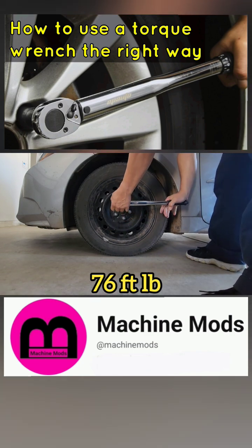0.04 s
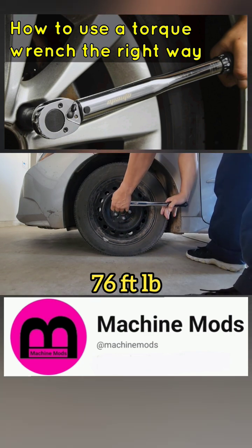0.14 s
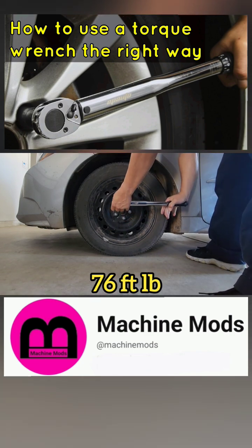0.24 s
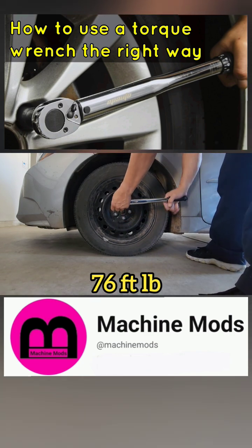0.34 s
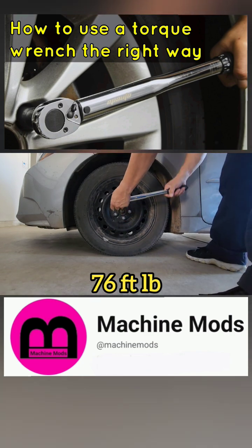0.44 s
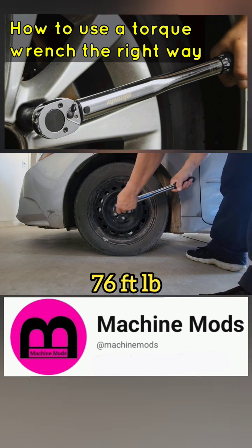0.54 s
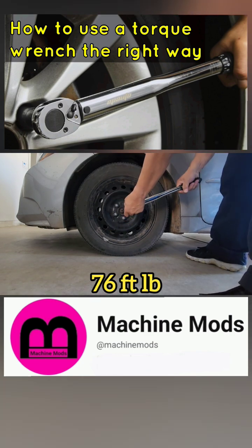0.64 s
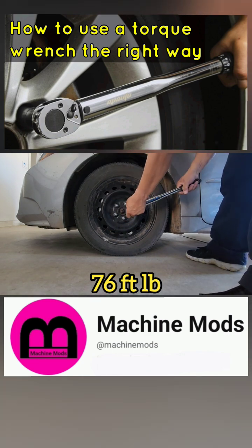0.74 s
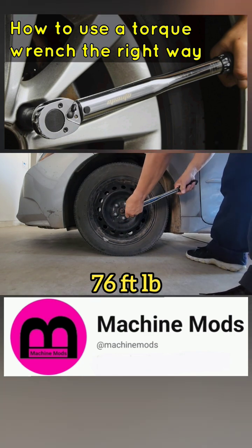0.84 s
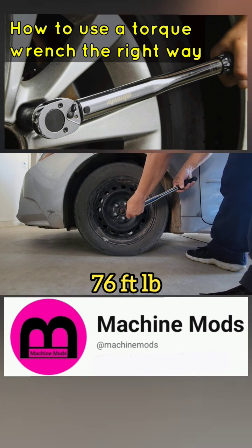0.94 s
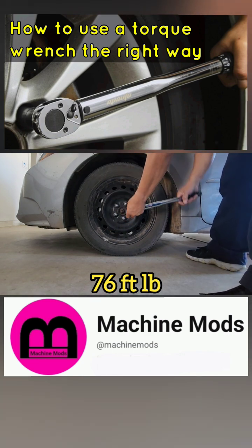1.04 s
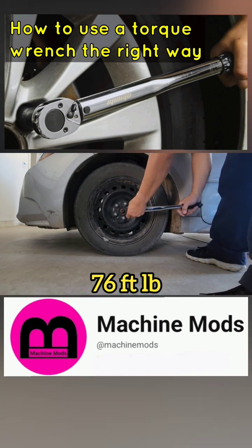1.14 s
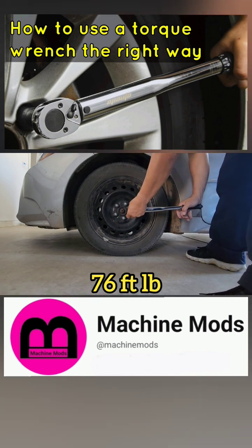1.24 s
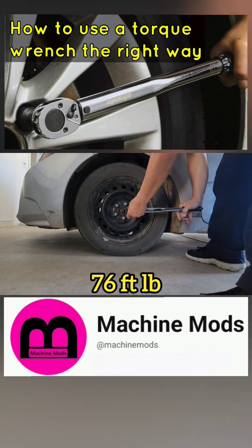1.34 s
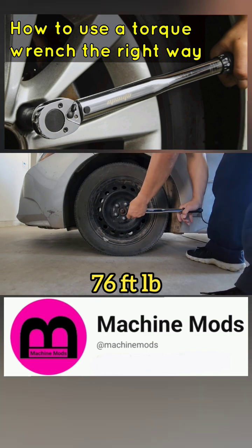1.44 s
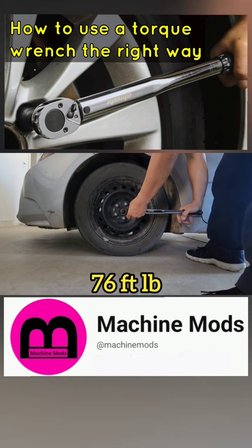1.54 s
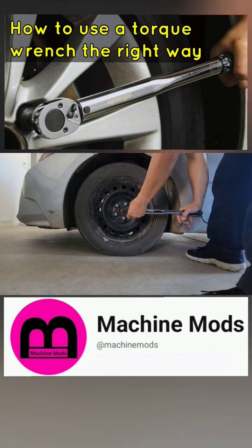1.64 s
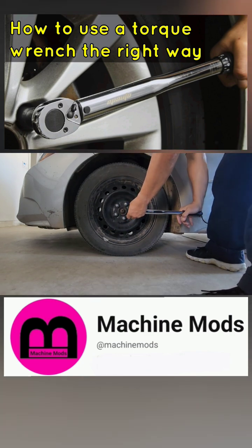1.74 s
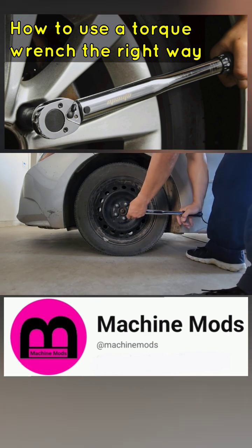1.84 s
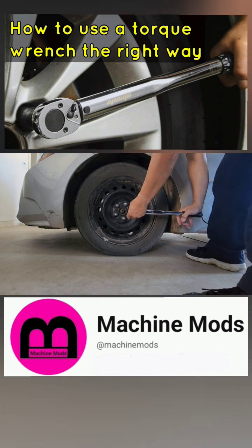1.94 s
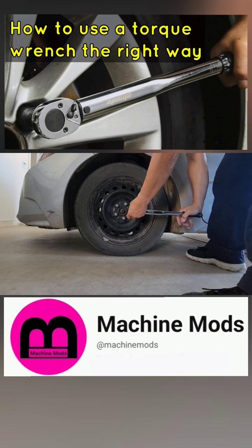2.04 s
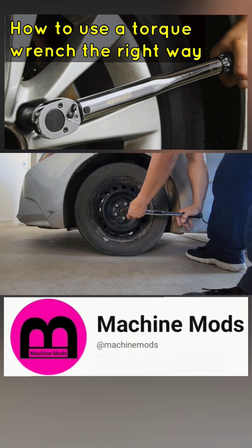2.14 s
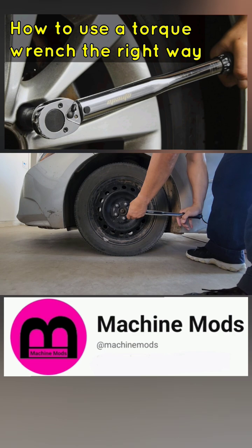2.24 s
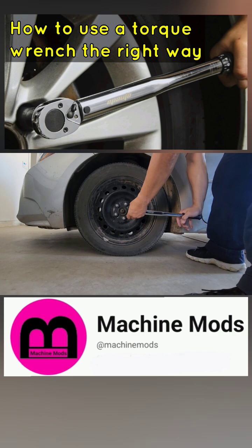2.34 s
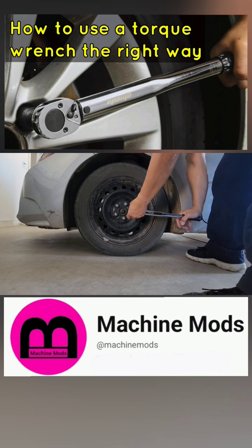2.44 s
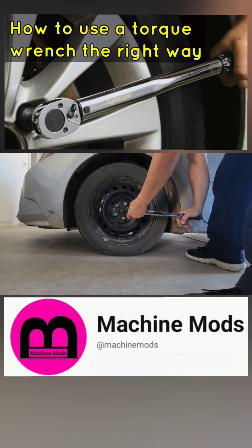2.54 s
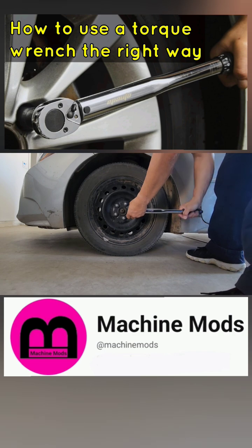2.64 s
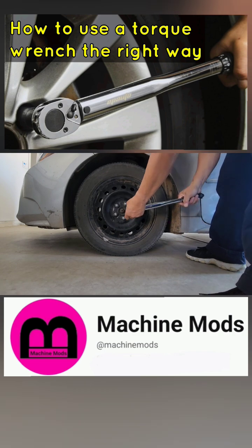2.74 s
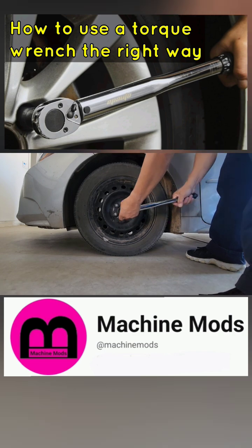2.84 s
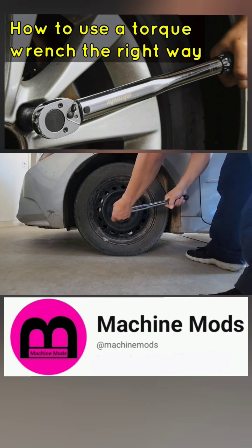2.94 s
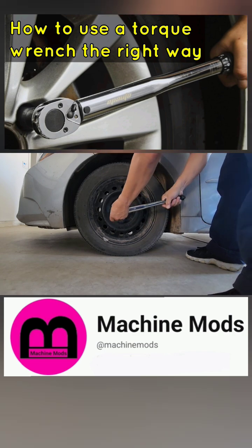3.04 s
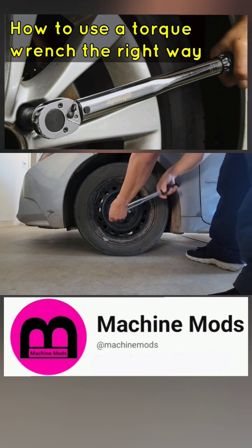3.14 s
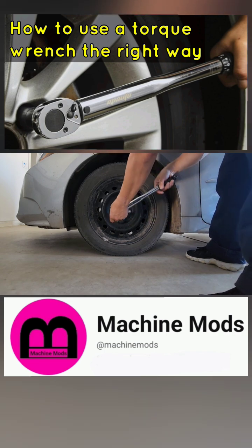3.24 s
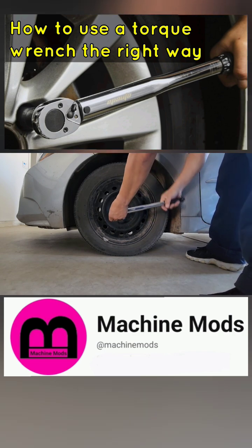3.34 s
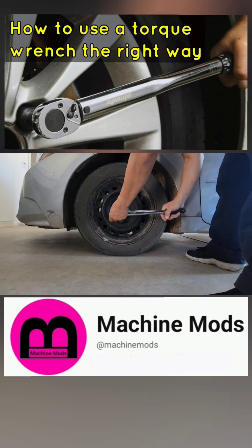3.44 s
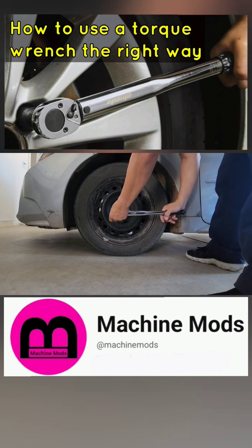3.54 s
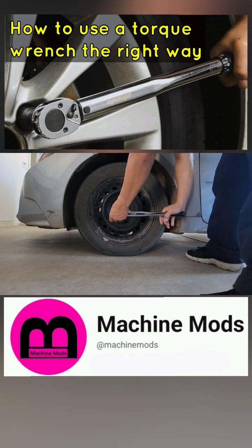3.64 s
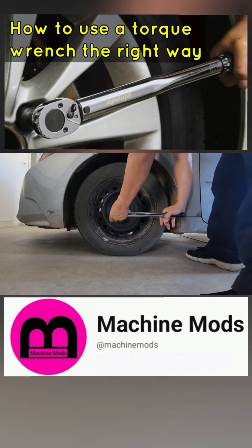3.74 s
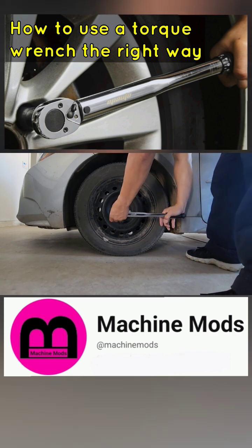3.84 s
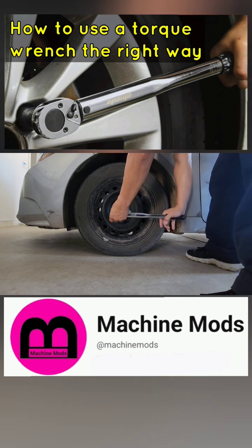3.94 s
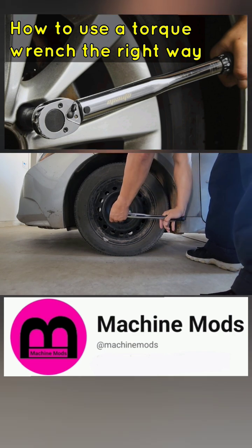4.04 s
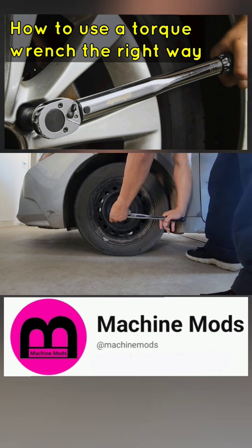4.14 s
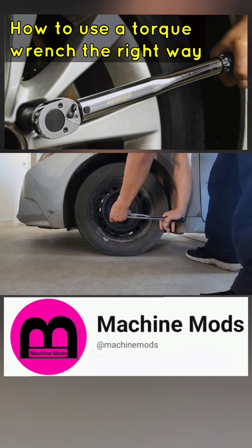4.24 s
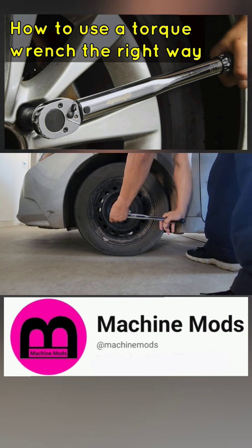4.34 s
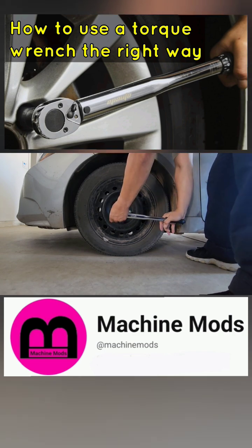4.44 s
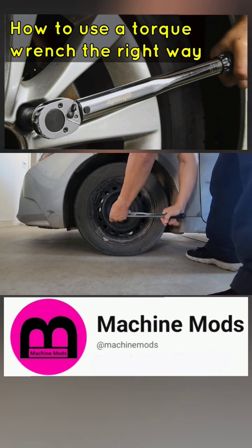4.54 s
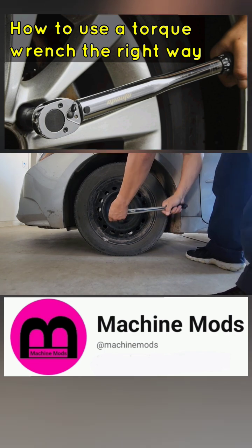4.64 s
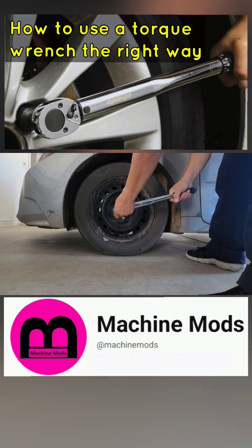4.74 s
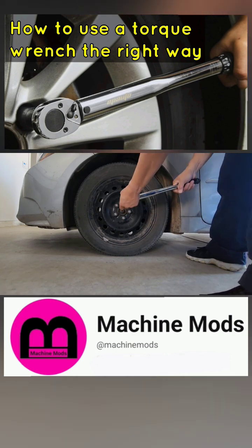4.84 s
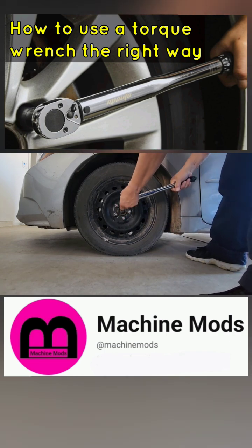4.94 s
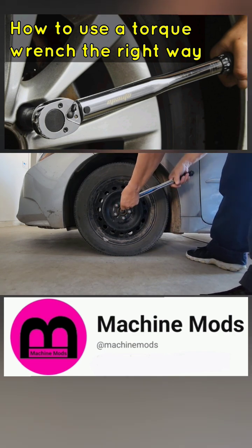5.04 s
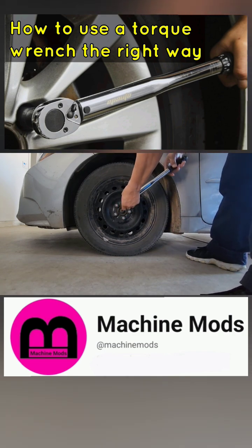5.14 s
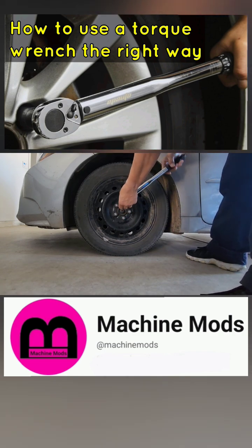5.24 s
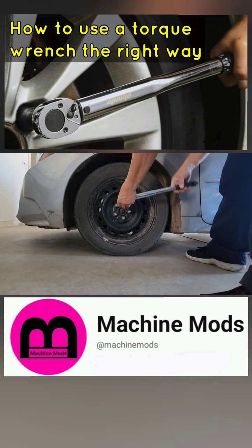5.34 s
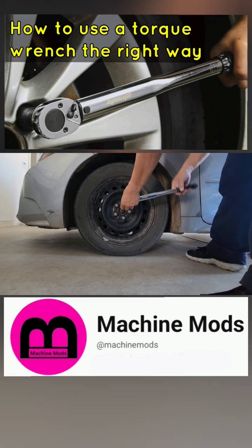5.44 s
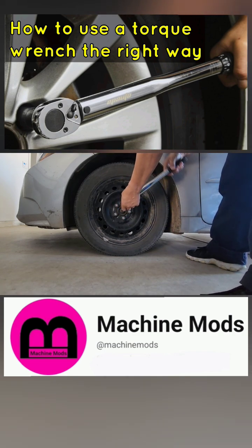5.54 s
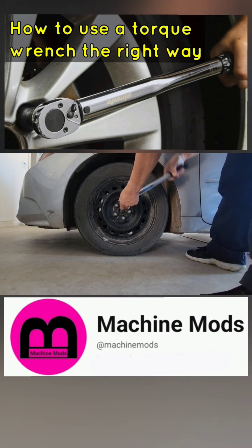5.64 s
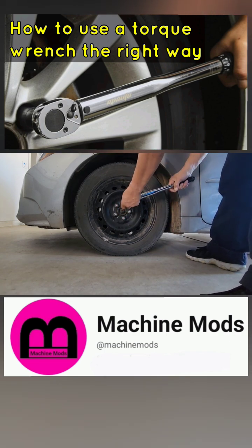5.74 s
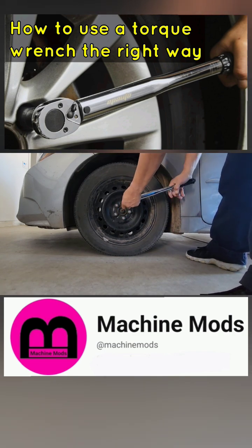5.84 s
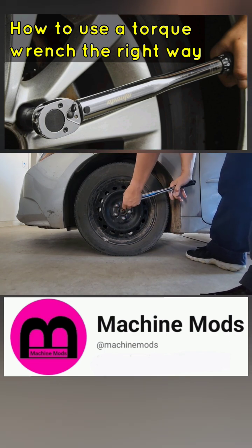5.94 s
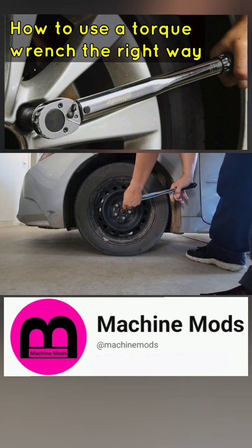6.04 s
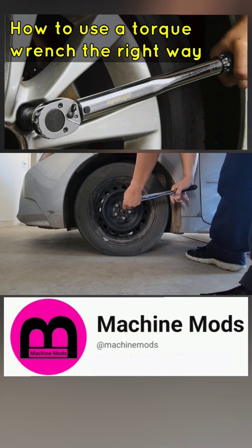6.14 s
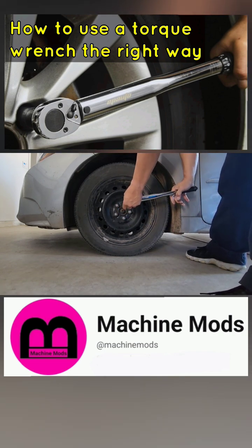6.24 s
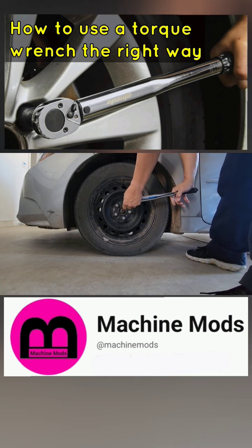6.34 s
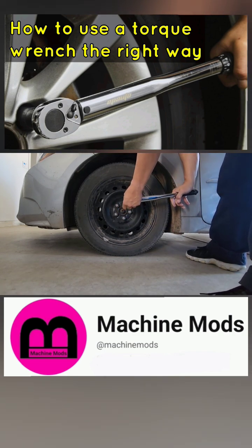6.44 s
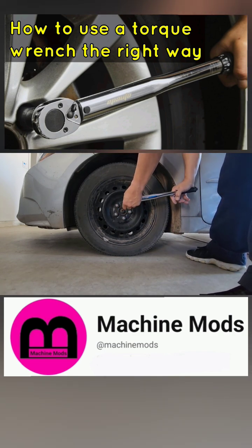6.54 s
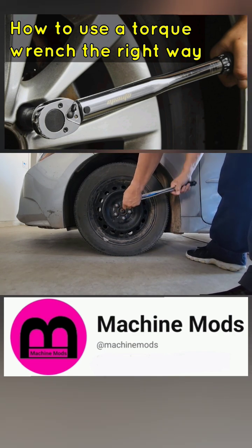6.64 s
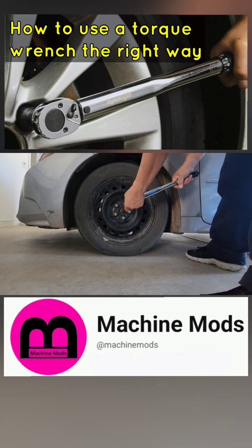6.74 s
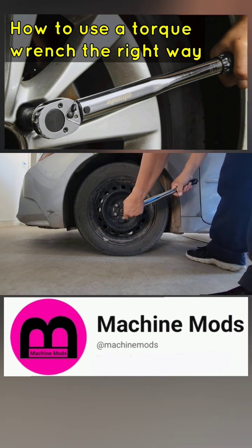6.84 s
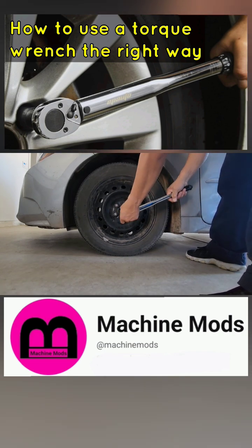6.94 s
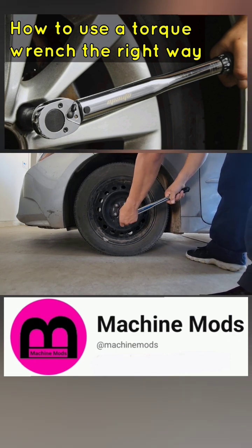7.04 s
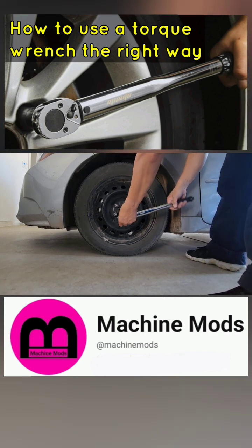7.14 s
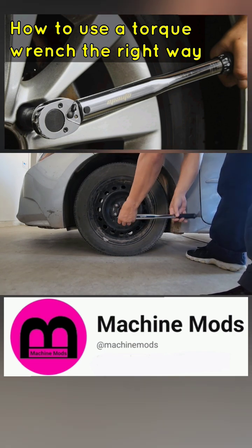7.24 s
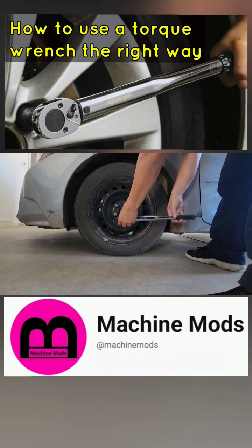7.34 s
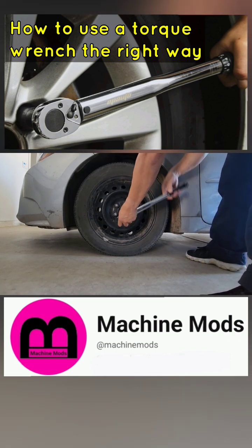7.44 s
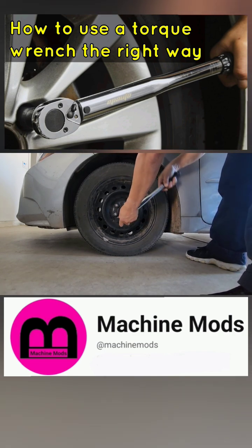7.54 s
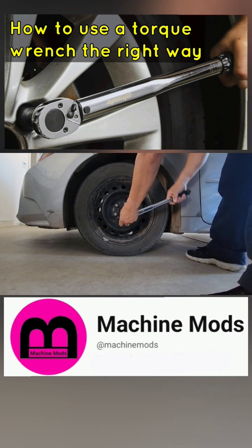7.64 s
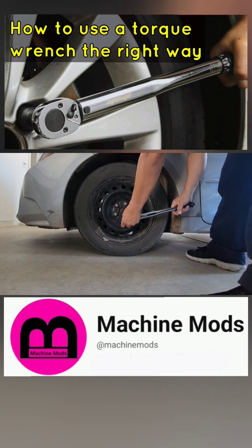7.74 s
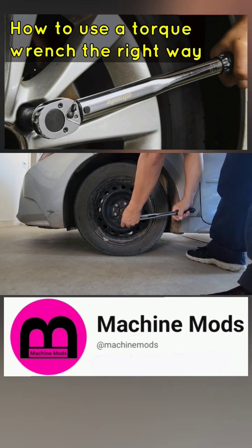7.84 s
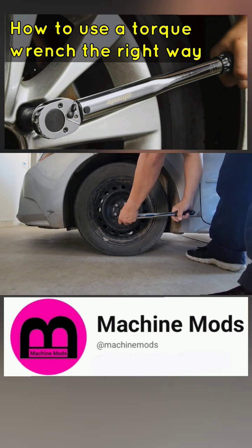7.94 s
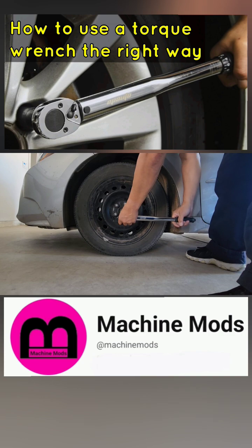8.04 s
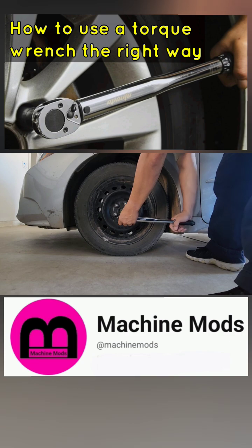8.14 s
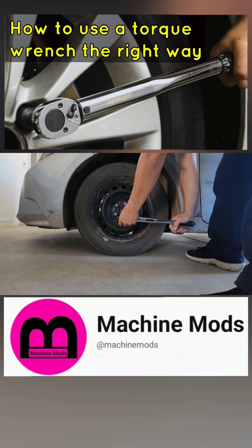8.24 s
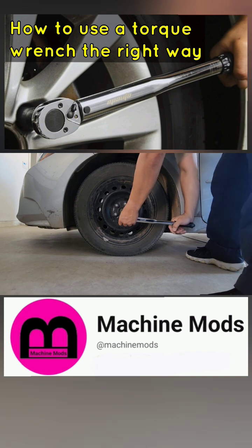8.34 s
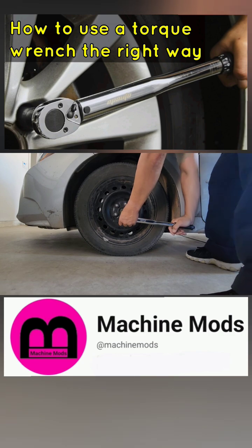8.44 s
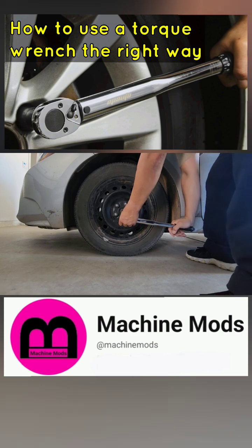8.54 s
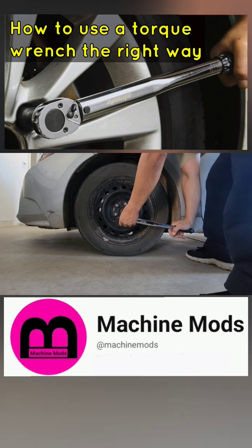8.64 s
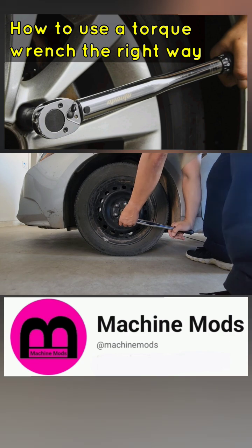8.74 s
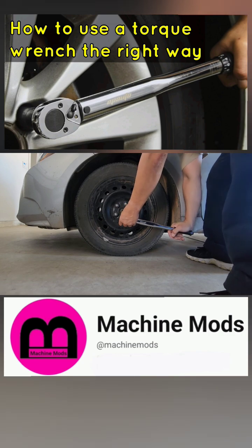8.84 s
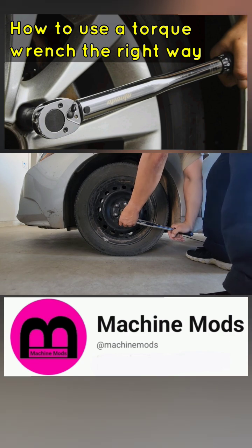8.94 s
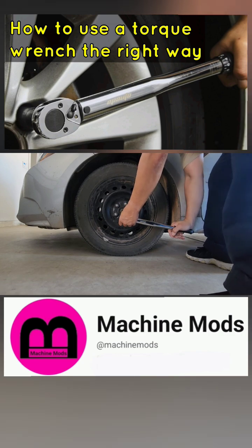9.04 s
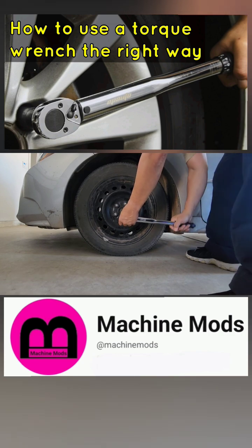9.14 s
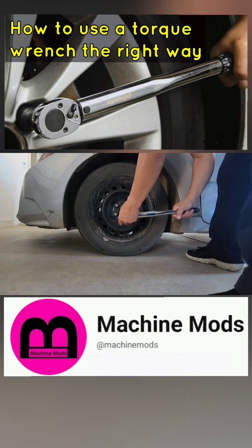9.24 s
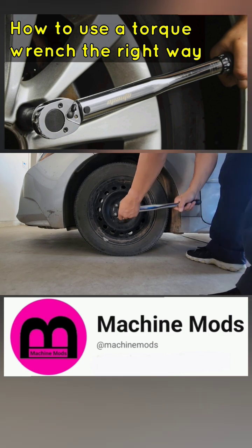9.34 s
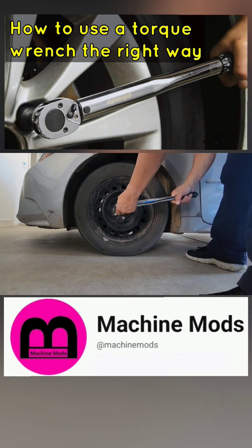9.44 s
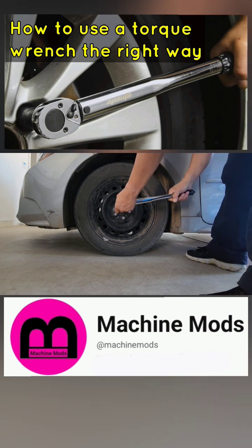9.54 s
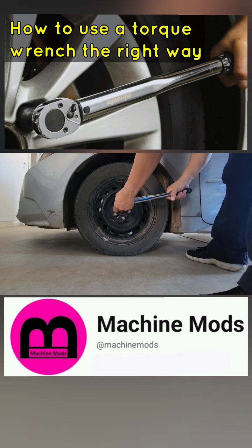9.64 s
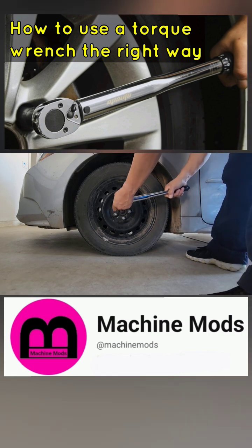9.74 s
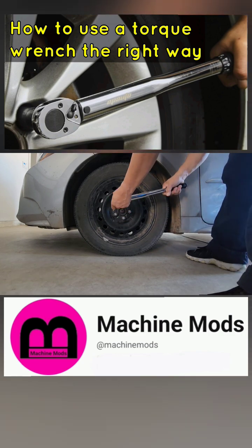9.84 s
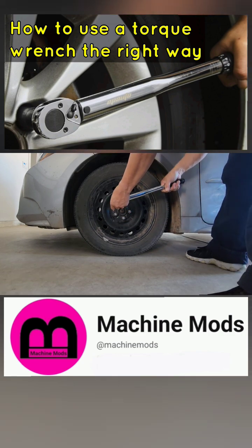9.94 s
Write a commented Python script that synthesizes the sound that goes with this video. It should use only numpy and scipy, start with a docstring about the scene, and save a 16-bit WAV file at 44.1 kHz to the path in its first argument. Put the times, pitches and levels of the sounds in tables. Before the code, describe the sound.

Close, sharp steel clicks come in five pairs as a torque wrench releases and snaps back on a car's wheel nuts. Between the pairs, the socket comes off, rattles lightly and drops onto the next nut with a short ring. A soft thud of shifting weight comes past the middle, then faint rubbing of sleeves and shoes. The socket clinks off once more at the end, against quiet garage air.

```python
"""A click-type torque wrench tightens five wheel nuts in a quiet garage, over faint hiss and rumble.
Each pull ends in a sharp release click; the hand eases off and a reset click follows, both ringing
through wrench and wheel. Then the socket tinks off the nut, clinks, scrapes and drops onto the next.
Near 6 s weight shifts on the floor, around 8 s sleeves and shoes rub, and after the fifth pair
of clicks, near 9 s, the socket comes off once more."""
import sys
import numpy as np
from scipy import signal
from scipy.fft import rfft, irfft
from scipy.io import wavfile
from scipy.ndimage import uniform_filter1d

SR = 44100
rng = np.random.default_rng(int(sys.argv[2]) if len(sys.argv) > 2 else 0)


def waveform_to_disk(signal):
    """Save audio, clipped to [-1, 1], as 16-bit WAV at the path in sys.argv[1]."""
    frames = np.transpose(np.atleast_2d(signal))
    scaled = np.clip(frames, -1, 1) * 32767
    samples = np.round(scaled).astype(np.int16)
    wavfile.write(sys.argv[1], SR, samples)


N = 440559


def torque_wrench():
    """The wrench lets go at the set torque, then snaps back. Gives timed blows and the tube's song."""
    # release clicks: t/s, level/dB, favoured pitch/Hz, its lift/dB, long ring/dB
    releases = [(0.202, -7.5, 2745, 7, -39), (2.5024, -8.5, 2426, 3.5, -46), (4.4551, -11.5, 2750, 12, -40),
                (6.4971, -10, 2740, 3, -42.5), (8.955, -10.5, 2590, 11, -38)]
    # reset clicks: the same columns, then tube song/dB
    resets = [(0.4296, -8, 7370, 0, -33, -56), (2.6873, -6, 2710, 2, -44, -55.5),
              (4.6127, -8.5, 2660, 5.5, -39, -42.5), (6.6758, -8.5, 7100, 5.5, -39.5, -68),
              (9.14, -7.5, 6870, 4, -38.5, -53.5)]
    # two close tube modes that beat slowly: f/Hz, level/dB, t60/s
    tube_modes = [(10870, 0, .8), (10877, -7, .8)]
    blows, song = [], np.zeros((2, N))
    for t, level_db, pitch_hz, lift_db, free_db in releases:
        click = blow(level_db, pitch_hz, lift_db, free_db, thump_db=-11.5, knock_db=-15.5, upper_db=2.5,
                     bright_db=-4, contact_ms=2, rise_ms=4, pan_db=-2, send_db=-2)
        blows.append((t, click))
    for t, level_db, pitch_hz, lift_db, free_db, tube_db in resets:
        click = blow(level_db, pitch_hz, lift_db, free_db, thump_db=-10, knock_db=-12.5, upper_db=2.5,
                     bright_db=-3.5, contact_ms=5, rise_ms=3.2, pan_db=-4.5, send_db=-8.5)
        blows.append((t, click))
        add(song, t, gain_of(tube_db) * ring(tube_modes, SR, scatter_db=0, detune=0))
    return blows, song


def loose_socket():
    """The socket knocks its way from nut to nut. Gives timed blows and the socket's own ring."""
    # pitched tinks off the nut: t/s, level/dB, knock/dB, brightness/dB, base contact/ms, pitch/Hz
    tinks = [(0.8213, -28, -10.5, -28, 1.2, 2030), (3.0685, -38.5, -3.5, -11, 7.3, 1910),
             (4.9825, -21, -14, -17, 5.6, 2090), (7.0431, -37, 0.5, -14, 4.7, 1960),
             (9.9077, -26, -5.5, -19, 4.2, 2407)]
    # it drops home on the next nut: same columns
    seatings = [(0.9227, -18.5, -7.5, -23, 7, 3060), (3.176, -17.5, -10.5, -17, 5.2, 5440),
                (5.4362, -16.5, -12.5, -14, 4.25, 5000), (7.4901, -15, -8, -11, 6, 7070)]
    # it drags over the nut: same columns
    scrapes = [(3.095, -20, -13, -12, 13, 7300), (3.146, -22.5, -17, -9.5, 15, 7600),
               (5.022, -17, -13, -12.5, 7.3, 2250), (7.087, -16.5, -13, -15.5, 13, 3000),
               (7.3243, -20, -16.5, -9, 4.9, 2760)]
    # it touches nut and wheel: same columns
    clinks = [(0.616, -40.5, -10, -12, 3.9, 1632), (0.8145, -49, 10, -58, 3, 1950),
              (0.848, -15, -16.5, -16.5, 15, 7550), (0.946, -28.5, -8.5, -17, 5.4, 3600),
              (1.1176, -53, 0, -27, 3.1, 2640), (1.1524, -32.5, -11.5, -20, 5.7, 4800),
              (1.3583, -58, -5, -29, 3.8, 2580), (1.5688, -59.5, -9, -23, 2.3, 5800),
              (2.784, -27.5, -23, -16, 2.7, 5600), (3.0829, -28, -18, -18, 5.7, 2080),
              (3.2784, -55, 5.5, -22, 4.4, 5560), (3.3176, -47.5, -19, -18, 3.9, 1920),
              (3.4441, -52, -6, -34, 6.4, 2570), (3.469, -43, -7, -26, 4.7, 4320),
              (3.6611, -61, -18, -21, 3.9, 2600), (3.7192, -66, -31, -39, 2.7, 2530),
              (4.7702, -40, -5.5, -2, 4.6, 2520), (5.2185, -47, -17, -11, 4.4, 3160),
              (5.261, -20, -23, -12, 7.2, 5150), (5.3919, -38, -4, -29, 4.9, 2600),
              (5.4041, -21.5, -12.5, -11.5, 2, 5810), (5.4277, -18, -18.5, -8.5, 8.5, 2760),
              (5.4544, -29, -8, -8, 2.6, 2140), (5.5897, -15.5, -20, -12.5, 9.7, 2820),
              (5.6527, -22, -19.5, -5, 4.7, 5220), (5.8014, -47, -3.5, -16, 5.3, 1640),
              (5.915, -54.5, -15, -29, 4.5, 2390), (7.081, -24.5, -7.5, -7, 2.6, 3174),
              (7.2587, -56, 10.5, -33, 3.9, 1600), (7.3387, -19, -14.5, -10.5, 11, 5200),
              (7.4831, -28.5, -18, -12, 6.7, 2680), (7.5552, -18, -20.5, -10.5, 12, 5570),
              (7.7669, -56, 8.5, -50, 4.2, 3400), (7.9663, -64.5, -7.5, -26, 3.9, 5200),
              (8.0537, -61, 10, -32, 1.36, 2130), (9.3222, -38, -12, -2.5, 4.5, 2500),
              (9.7513, -69, 0.5, -17, 3.9, 1425), (9.7744, -73, -4, -12.5, 5.6, 1782),
              (0.889, -33, -13, -32, 5.3, 2260), (9.9218, -19, -30, -15.5, 11, 2460)]
    # socket modes: f/Hz, level/dB, t60/s
    socket_modes = [(3110, -8.5, 0.39), (4170, -4.5, 0.23), (5645, -9, 0.19)]
    blows, ringing = [], np.zeros((2, N))
    for contacts, lift_db, rise_ms, garage_db in [(tinks, 19.7, 0.6, -3), (seatings, 9.5, 0.26, -8.5),
                                                  (scrapes, 3, 1.6, -3.24), (clinks, 7.8, 0.54, -7)]:
        for t, level_db, knock_db, bright_db, contact_ms, pitch_hz in contacts:
            thump_db = -20.5 - 0.48 * level_db + 0.5 * knock_db  # the tyre favours a soft push
            send_db = garage_db - 0.6964 * contact_ms  # a long chatter reaches the garage less
            touch = blow(level_db, pitch_hz, lift_db, free_db=-43, thump_db=thump_db, knock_db=knock_db,
                         upper_db=-4, bright_db=bright_db, contact_ms=contact_ms, rise_ms=rise_ms,
                         pan_db=-0.5, send_db=send_db)
            blows.append((t, touch))
    for t, level_db, *_ in seatings + scrapes + clinks:
        add(ringing, t, gain_of(level_db - 26.5) * ring(socket_modes, SR // 2, scatter_db=4, detune=.001))
    return blows, ringing


def blow(level_db, pitch_hz, lift_db, free_db, *, thump_db, knock_db, upper_db, bright_db,
         contact_ms, rise_ms, pan_db, send_db):
    """Steel strikes steel: a crack, then wrench, wheel and hub answer. Gives left, right, reverb send."""
    # wrench head and tube: f/Hz, level/dB, t60/s
    wrench_modes = [(2290, -8, 0.12), (2687, 1.5, 0.12), (3200, -6.5, 0.2), (4370, -13, 0.14),
                    (5280, -19.5, .05), (5350, -1.5, 0.19), (6700, -12, .04), (6320, 2.5, 0.15),
                    (6880, 1.5, 0.28), (7380, 15, 0.064), (8600, 0.5, 0.082), (10400, 4.5, 0.03),
                    (11200, 8, 0.035), (13125, 19.5, 0.043), (13000, 8.5, 0.054)]
    # brake, hub and socket, free to ring on: f/Hz, level/dB, t60/s
    free_modes = [(416, -5, 2.3), (465.3, -1, 2.4), (607, 4.5, 0.31), (888, -15, 1.6), (1375, -8.5, 2.1),
                  (5700, 5, .3)]
    length, routing = 2 ** 15, [0, 1, 0]  # the send is fed from the left
    t, hz = np.arange(length) / SR, np.fft.rfftfreq(length, 1 / SR)
    softness = 1.5 + 0.079 * max(-level_db - 28.5, 0)  # light touches are slow and rounded
    attack = 1 - np.exp(-t * 1000 / np.clip(rise_ms * softness, .1, 15))
    decay = np.exp(-t * 1000 / np.clip(contact_ms * np.sqrt(softness), .3, 25))
    wrench = gain_of(-1.5) * attack[:length // 4] * ring(wrench_modes, length // 4, scatter_db=2)
    spectrum = crack(attack * decay, hz) + rfft(wrench, length)
    tilt_db = curve([(760, knock_db), (900, knock_db + upper_db), (1450, knock_db + upper_db),
                     (2000, 0.021), (6000, 0.0036), (9500, bright_db)], hz)
    peak_db = lift_db * np.exp(-(np.log2((hz + 1) / pitch_hz) / 0.22) ** 2)
    peak_share = np.array([[1], [1], [0.25]])  # echoes mix all faces of the steel, blunting the pitch
    steel = irfft(spectrum[routing] * gain_of(tilt_db + peak_db * peak_share), length)
    steel *= gain_of([[pan_db / 2], [-pan_db / 2], [0]]) * np.hanning(2 * length)[length:]
    sound = gain_of(free_db) * ring(free_modes, 2 * length, scatter_db=1)[routing]
    sound[:, :length] += steel + wheel(t, attack, knock_db, upper_db, thump_db)[routing]
    sound[2] *= gain_of(send_db)
    return gain_of(level_db - 0.5) * sound


def crack(envelope, hz):
    """Steel chatters on steel for a few milliseconds: the stereo spectrum of a broad noise burst."""
    # colour of the crack: f/Hz, density/dB
    crack_spectrum = [(180, -26), (300, -3.5), (660, -6.5), (807, -12), (1170, -1), (1870, -12),
                      (2610, -12.5), (3840, -11.5), (6670, -11.5), (10100, -6.5), (14700, -9),
                      (15700, -9.5), (16500, -59.5)]
    left, other = rng.standard_normal((len(envelope), 2)).T
    chatter = envelope * np.array([left, 0.6 * left + 0.8 * other])  # each side hears another face
    chatter /= np.linalg.norm(chatter[0])
    return rfft(chatter) * unit_rms(gain_of(curve(crack_spectrum, hz))) * np.sqrt(SR / 200)


def wheel(t, attack, knock_db, upper_db, thump_db):
    """The rim knocks and the tyre thumps; the heavier the part, the later it gets moving."""
    # steel rim, damped by tyre and hand: f/Hz, level/dB, t60/s
    rim_modes = [(292, 0.5, 0.063), (347, -3.5, 0.028), (395, 4, 0.058), (584, 3.5, 0.054), (652, -8, 0.11),
                 (1000, -8, 0.082), (1175.6, -6, 0.024), (1242, 1, 0.016), (1497, -2, 0.11),
                 (1717, -5, 0.16)]
    # low modes of tyre and wheel: f/Hz, level/dB, t60/s
    tyre_modes = [(66.5, -12, 0.31), (80, -7, 0.31), (107.4, -8.5, 0.42), (146, 5, 0.13), (170, -1, 0.085)]
    # a hard click stirs the rim's upper modes, the socket mainly its lower ones
    stirred = [(f, db + upper_db * (f > 850), t60) for f, db, t60 in rim_modes]
    rim = ring(stirred, len(t), scatter_db=2, detune=0.005) * attack * (1 - np.exp(-t / 0.00089))
    tyre = ring(tyre_modes, len(t), scatter_db=1, detune=0.005) * (1 - np.exp(-t / 0.0082))
    return gain_of(knock_db) * rim + gain_of(thump_db) * tyre


def ring(modes, length, scatter_db, detune=0.0025):
    """Dying sines in stereo; strike point and grip vary, scattering the levels and pitches a little."""
    hz, db, t60 = np.transpose(modes)[:, :, None]
    t = np.arange(length) / SR
    level_draw, pitch_draw, start_phase, side_draw = rng.standard_normal((len(hz), 4)).T[:, :, None]
    phase = 2 * np.pi * hz * (1 + detune * pitch_draw) * t + start_phase
    right_shift = side_draw * np.minimum(hz / 900, 1.5)  # above the bass each side has its own phase
    envelope = gain_of(db + scatter_db * level_draw - 60 * t / t60) / np.linalg.norm(gain_of(db))
    envelope *= signal.windows.tukey(2 * length)[length:]
    return np.array([(envelope * np.sin(phase + shift)).sum(0) for shift in (0, right_shift)])


def in_garage(blows):
    """Each blow arrives direct, left side first, then through one of three alternating reverb tails."""
    direct, sends = np.zeros((2, N)), np.zeros((3, N))
    for k, (t, (left, right, send)) in enumerate(blows):
        onset = t - 0.0006
        add(direct[0], onset, left)
        add(direct[1], onset + rng.uniform(40e-6, 130e-6), right)
        add(sends[k % 3], onset, send)  # so like hits ring slightly differently
    return direct + sum(garage_reverb(send) for send in sends)


def garage_reverb(send):
    """A dense tail starts after the first wall, its top cut off sharply above 15 kHz."""
    # decay of the reverb tail: f/Hz, t60/s
    decay_times = [(100, 0.57), (400, 0.36), (1100, 0.49), (2900, 0.41), (7700, 0.25), (15000, 0.15),
                   (16000, 0.017)]
    frame_t = np.arange(SR // 64) * 64 / SR
    tail = diffuse(lambda hz: -60 * frame_t / curve(decay_times, hz), len(frame_t), size=256)
    tail *= np.clip((np.arange(tail.shape[1]) / SR - 0.003) / 0.002, 0, 1)  # 3 ms pre-delay
    return signal.fftconvolve(send[None], tail / np.linalg.norm(tail[0]), axes=1)[:, :N]


def weight_shift():
    """Weight shifts on the floor with a dull thud."""
    # thuds: peak t/s, level/dB, swell/s, fade/s
    steps = [(5.799, -44.5, 0.055, 0.21), (5.891, -61, .03, .12)]
    thud = [(20, -16), (50, 2.5), (300, -15), (900, -24.5), (3000, -75)]  # f/Hz, density/dB
    return swells(steps) * noise_bed(lambda hz: curve(thud, hz), size=2048)


def rustle():
    """Sleeves and soles rub faintly, in uneven grains."""
    # rubs: peak t/s, level/dB, swell/s, fade/s
    rubs = [(7.7, -66.5, 0.023, 0.22), (8.054, -67, .04, 0.087), (8.099, -64, .01, 0.031),
            (8.184, -76, 0.2, 0.11), (8.618, -74, 1, 0.72)]
    # colour of rubbing cloth: f/Hz, density/dB
    cloth = [(290, -37), (500, -10), (599, -12.5), (1360, -20), (2660, -17.5), (3570, -23.5), (7480, -17),
             (14000, -52)]
    grain_db = 2.7 * unit_rms(uniform_filter1d(rng.standard_normal(N // 64 + 5), size=8))
    return swells(rubs) * noise_bed(lambda hz: curve(cloth, hz) + grain_db, size=256)


def distant_rumble():
    """A far-off rumble around 62 Hz ebbs away and returns at the end."""
    # its fader ride: t/s, level/dB
    ride = [(0, -59.5), (1.2, -61), (2.3, -58.5), (3.3, -70.5), (4.2, -72), (6.2, -75.5), (8.5, -78),
            (9.99, -65.5)]
    rumble = noise_bed(lambda hz: -40 * np.minimum(np.log2((hz + 1) / 62) ** 2, 2), size=2048)
    return gain_of(np.interp(np.arange(N) / SR, *np.transpose(ride))) * rumble


def room_tone():
    """The steady air of the garage: a low hush under a faint hiss with two blurred tones."""
    # colour of the hush: f/Hz, density/dB
    hush_spectrum = [(15, -62.5), (25, -31.5), (44, -13), (65, -4.5), (80, -3), (91, -12), (176, -13),
                     (255, -24), (340, -25.5), (518, -33), (845, -32), (1400, -55.5), (1820, -80.5),
                     (3080, -120)]
    # colour of the hiss: f/Hz, density/dB
    hiss_spectrum = [(710, -37.5), (1200, -6.5), (1320, -7), (2320, -14), (4700, -17.5), (5840, -14),
                     (6510, -21.5), (16000, -24)]
    # blurred tones: f/Hz, width/Hz, lift over the hiss/dB
    whines = [(5300, 120, 5), (8100, 520, 7.5)]
    tones_db = lambda hz: sum(db * np.exp(-((hz - f) / width) ** 2) for f, width, db in whines)
    hush = noise_bed(lambda hz: curve(hush_spectrum, hz), size=2048)
    hiss = noise_bed(lambda hz: curve(hiss_spectrum, hz) + tones_db(hz), size=1024)
    return gain_of(-63) * hush + gain_of(-82) * hiss


def diffuse(level_db, frames, size):
    """Stereo noise shaped by level_db(hz) in each frame, near mono in the bass."""
    # stereo image of diffuse sound: f/Hz, left-right likeness/0..1
    image = [(60, 1), (250, 0.92), (600, 0.72), (1500, 0.21), (6000, 0.18), (15000, 0.78)]
    hz = np.fft.rfftfreq(size, 1 / SR)[:, None]
    a, b, c, d = rng.standard_normal((frames, len(hz), 4)).T
    likeness, left = curve(image, hz), a + 1j * b
    right = likeness * left + np.sqrt(1 - likeness ** 2) * (c + 1j * d)
    spectra = np.array([left, right]) * gain_of(level_db(hz))
    return signal.istft(spectra, nperseg=size, noverlap=size * 3 // 4)[1]


def noise_bed(level_db, size):
    """Scene-long diffuse noise at unit RMS."""
    return unit_rms(diffuse(level_db, N // (size // 4) + 5, size)[:, :N])


def swells(rows):
    """Summed envelopes, each climbing 40 dB in its swell time and dropping 40 dB in its fade time."""
    t = np.arange(N) / SR
    return sum(gain_of(db - 40 * np.maximum((peak - t) / swell, (t - peak) / fade))
               for peak, db, swell, fade in rows)


def gain_of(db):
    return 10 ** (np.asarray(db) / 20)


def unit_rms(x):
    return x / np.sqrt(np.mean(x ** 2) + 1e-20)


def curve(points, hz):
    """Joins breakpoints along a log-frequency axis."""
    f, value = np.transpose(points)
    return np.interp(np.log(hz + 1), np.log(f + 1), value)


def add(mix, t, sound):
    part = mix[..., round(t * SR):][..., :sound.shape[-1]]
    part += sound[..., :part.shape[-1]]


def scene():
    """Wrench and socket up front, body movement and garage air far behind."""
    clicks, tube_song = torque_wrench()
    contacts, socket_ring = loose_socket()
    metal = in_garage(clicks + contacts) + tube_song + socket_ring
    return metal + weight_shift() + rustle() + distant_rumble() + room_tone()


def record(dry):
    """A soft clip rounds the loudest peaks; a steep low-pass trims the top."""
    ceiling, cutoff_hz = 0.9, 16600
    rounded = dry / (1 + abs(dry / ceiling) ** 6) ** (1 / 6)
    low_pass = signal.firwin(511, cutoff_hz, window=("kaiser", 9), fs=SR)
    return signal.oaconvolve(rounded, low_pass[None], "same")


dry = scene()
out = record(dry)
waveform_to_disk(out)
```